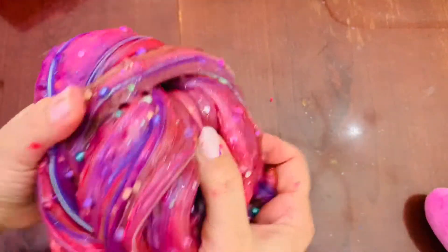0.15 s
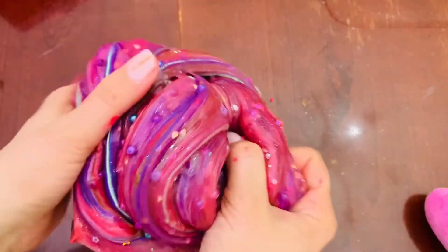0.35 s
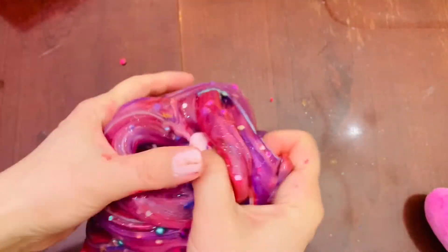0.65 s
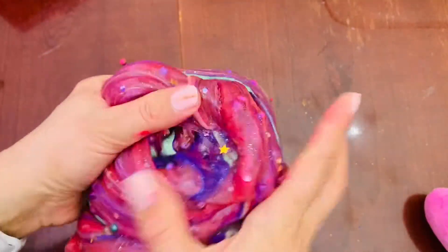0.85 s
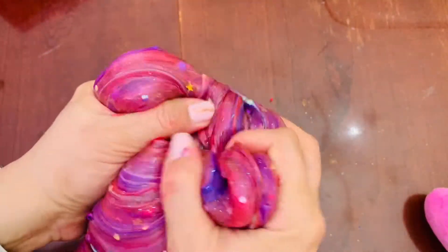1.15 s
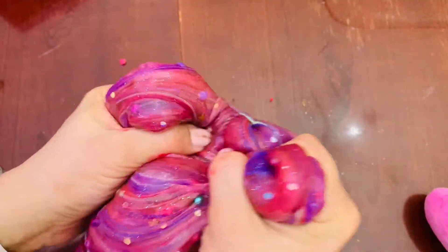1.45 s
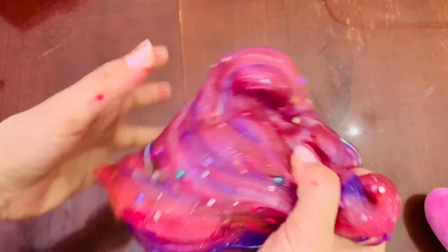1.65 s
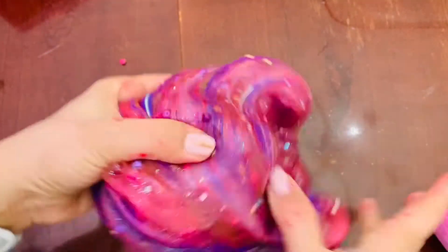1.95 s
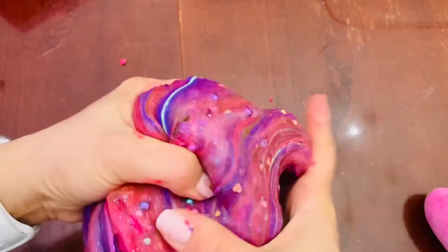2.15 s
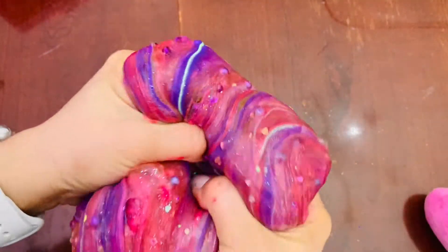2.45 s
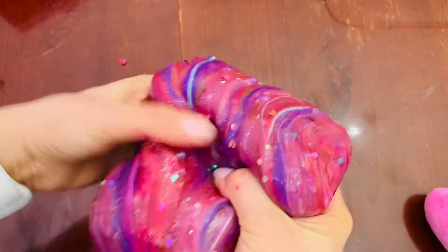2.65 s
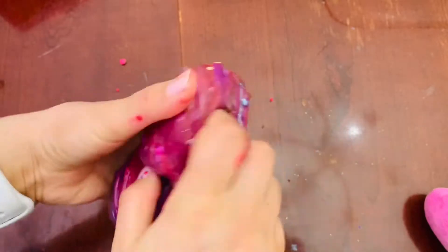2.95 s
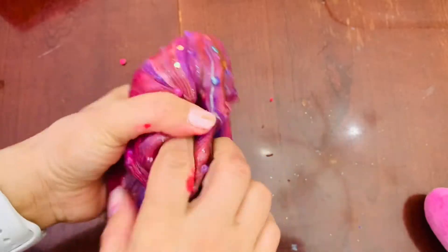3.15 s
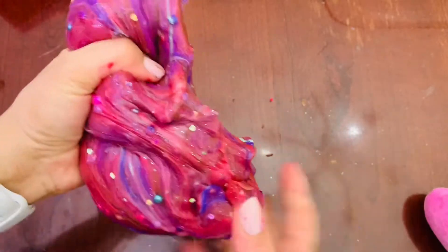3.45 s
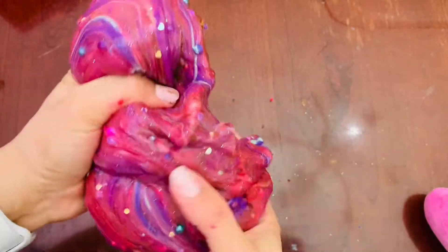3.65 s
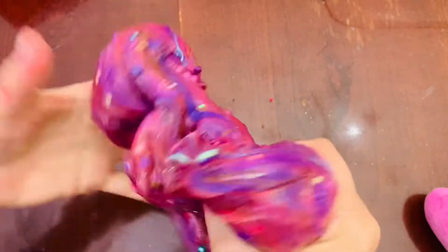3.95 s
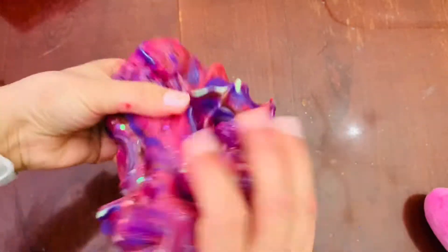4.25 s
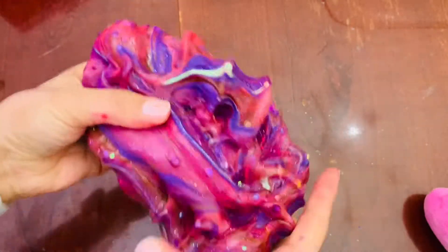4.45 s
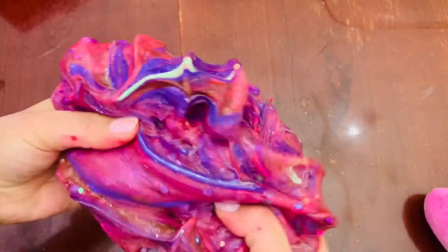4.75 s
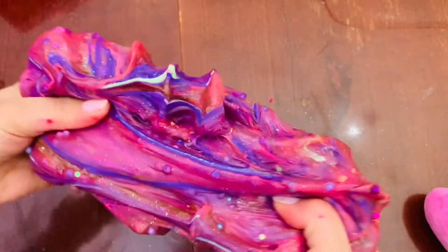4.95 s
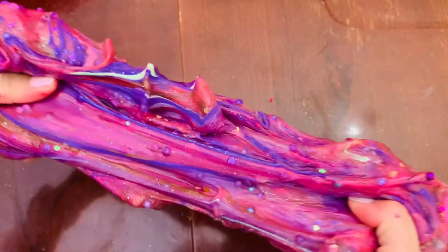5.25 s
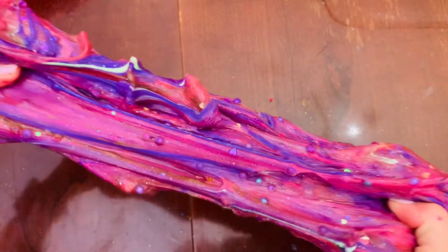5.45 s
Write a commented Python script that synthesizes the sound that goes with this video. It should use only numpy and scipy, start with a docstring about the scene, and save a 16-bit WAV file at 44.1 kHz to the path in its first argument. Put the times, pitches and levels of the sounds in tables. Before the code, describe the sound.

Sticky slime is kneaded, folded and stretched by two hands, close and detailed in stereo, in a small dry quiet room with very faint low rumble and hiss. Air bubbles burst as very short bright snaps, some with a tiny hollow ring, amid brief swells of peeling fizz and wet squelch. A cluster of sharp clicks comes at about 0.4 s, with a soft low thump at 0.3; the busiest, loudest popping runs from 0.9 to 1.25 s, then a wet squelch with plops near 1.5. From 1.6 to 2.8 s the crackle is lighter, with a small flurry at 2.3-2.5. Hard snaps stand out at 2.86, 3.14-3.2, 3.44 and 3.52 s. After a sparse gap around 4 s, sticky peels come at 4.2 and a crisp squelchy pop at 4.7. From 5 s the slow stretch leaves only faint ticks, almost silence.

```python
"""Sticky slime, kneaded, folded and stretched by two hands just in front of a pair of microphone ports.
Trapped air pockets burst: a torn film gives a noise snap, the opened pocket a short damped ring.
Wet skin peels off in swells of fizz, squelch and thud, built from grains and patchy noise.
The lump slumps onto the hand with sagging low thumps.
A small quiet room adds shaped noise as low rumble and faint hiss, and a short answer to the pops."""
import sys
import numpy as np
from scipy import signal
from scipy.fft import rfft, irfft, next_fast_len
from scipy.io import wavfile
from scipy.ndimage import uniform_filter1d, map_coordinates

SR = 44100
rng = np.random.default_rng(int(sys.argv[2]) if len(sys.argv) > 2 else 0)


def wrap_up_sound(samples):
    """Save the sound to the file named by the first command line argument, as 16-bit audio."""
    columns = np.atleast_2d(samples).T
    # keep every value between -1 and 1, then stretch to whole-number steps
    tamed = np.clip(columns, -1, 1)
    steps = np.round(tamed * 32767).astype(np.int16)
    wavfile.write(sys.argv[1], SR, steps)


def convert_level_to_amplitude(level_db):
    """Map a level in decibels to its linear amplitude factor."""
    exponent = np.asarray(level_db, float) / 20
    return 10 ** exponent


N = 246959

# clearest bursting air pockets: t/s, snap level/dB, snap f/Hz, ring level/dB, ring f/Hz
CLEAR_POCKETS = [(0.05, -19.5, 8900, -20.5, 2400), (0.078, -34.5, 11100, -38.5, 1000),
                 (0.0858, -11, 11200, -37.5, 1740), (0.216, -32, 5630, -34.5, 2100),
                 (0.274, -27, 11900, -58, 1460), (0.305, -37, 5600, -24.5, 1790),
                 (0.312, -25, 8900, -24.5, 1900), (0.3862, -6, 12200, -52, 1630),
                 (0.4048, -12.5, 11400, -74, 2780), (0.4135, -16.5, 11500, -71, 3250),
                 (0.4217, -7.5, 12100, -62, 1640), (0.4362, -26, 12800, -80, 1500),
                 (0.5756, -22.5, 11100, -70, 1510), (0.5993, -12.5, 6700, -18.5, 1880),
                 (0.6478, -22, 6850, -23, 1920), (0.6869, -43, 6700, -28, 2630),
                 (0.7738, -19.5, 9400, -59, 453), (0.8323, -35, 6660, -45, 1260),
                 (0.8873, -2.5, 10400, -32, 2400), (0.9139, -14.5, 9200, -37.5, 2200),
                 (0.9677, 2, 13200, -28.5, 2420), (0.9808, -40, 9200, -31, 2080),
                 (0.986, -35.5, 6000, -38, 1910), (1.0096, -11.5, 11800, -40.5, 2190),
                 (1.013, -10, 11200, -38, 2840), (1.062, -8, 12600, -61, 1460),
                 (1.08, -21, 11600, -34.5, 1830), (1.0894, -16, 9300, -31.5, 1830),
                 (1.1136, -13.5, 10400, -42, 1720), (1.12, -21, 10700, -57, 2900),
                 (1.1418, -16.5, 10400, -49, 2130), (1.157, -29, 8700, -44, 2280),
                 (1.1696, -17.5, 8800, -33.5, 2050), (1.1854, -2, 9400, -33.5, 1870),
                 (1.1987, -0.5, 12200, -49, 1410), (1.2305, -82, 7900, -33, 1120),
                 (1.2397, -3.5, 7630, -18, 1430), (1.2778, -33, 9100, -55, 3010),
                 (1.3324, -21, 12400, -34.5, 2050), (1.4596, -11.5, 8800, -27, 1200),
                 (1.464, -61, 8500, -21, 1250), (1.4767, -24, 8200, -14.5, 2550),
                 (1.4814, -17, 8500, -18, 2500), (1.5564, -26.5, 8500, -36, 3490),
                 (1.6257, -43, 6860, -38, 1500), (1.7639, -24.5, 8300, -21, 3830),
                 (1.7964, -16, 6600, -22.5, 1036), (1.8908, -18.5, 10500, -40.5, 1690),
                 (1.9214, -21, 10800, -51, 2610), (2.0455, -26.5, 10800, -41.5, 1660),
                 (2.062, -25.5, 7300, -25, 2830), (2.139, -22, 11100, -44.5, 1420),
                 (2.218, -19.5, 6900, -45, 2320), (2.2583, -7.5, 10900, -50.5, 520),
                 (2.2782, -23.5, 10200, -36.5, 1690), (2.2868, -17.5, 5700, -41, 1550),
                 (2.304, -31.5, 4770, -29.5, 3430), (2.3366, -20, 9900, -53, 3210),
                 (2.366, -50, 6000, -42.5, 980), (2.388, -40, 6100, -36.5, 750),
                 (2.3964, -13, 5830, -56, 2320), (2.4038, -44, 6100, -28.5, 1420),
                 (2.4195, -24, 11800, -47, 1720), (2.4396, -23, 11200, -38, 1450),
                 (2.4897, -19.5, 11400, -28.5, 3160), (2.4915, -14, 9000, -34.5, 1130),
                 (2.5138, -29, 7300, -60, 1980), (2.544, -30.5, 5060, -27.5, 3900),
                 (2.6136, -26.5, 9450, -25, 2620), (2.7572, -12, 7300, -32, 2940),
                 (2.8644, -3, 9240, -50, 3540), (2.931, -18.5, 13000, -48, 2090),
                 (2.9441, -27.5, 9200, -34.5, 2700), (3.0515, -24.5, 11300, -49.5, 1400),
                 (3.1419, 2, 6900, -32, 2600), (3.1825, 0, 10500, -26, 2860),
                 (3.2045, -17, 11800, -45, 3250), (3.233, -40, 5100, -28, 2800),
                 (3.277, -45, 7400, -29.5, 2500), (3.3384, -7, 8130, -31.5, 3560),
                 (3.366, -57, 4200, -34, 3920), (3.4382, 1, 11600, -48, 2260),
                 (3.5244, -3, 11400, -18, 4070), (3.689, -13.5, 10600, -43, 1370),
                 (3.7279, -18.5, 7300, -29, 3370), (3.738, -17.5, 8140, -38, 1310),
                 (3.8586, -21, 9500, -47, 3460), (3.8979, -27, 8970, -53, 1000),
                 (3.926, -27.5, 9000, -68, 3180), (3.955, -65, 7000, -55, 1200),
                 (4.3728, -26.5, 9160, -76, 2910), (4.4116, -18.5, 10440, -49, 3160),
                 (4.5679, -29, 8780, -74, 2750), (4.5794, -18.5, 13200, -40, 1860),
                 (4.584, -21.5, 14200, -38.5, 3300), (4.6377, -33.5, 5470, -44.5, 2930),
                 (4.681, -28, 7200, -41, 1600), (4.6949, -8.5, 7300, -33.5, 1590),
                 (4.698, -14, 7000, -33.5, 1885), (4.753, -31, 11400, -42, 1480),
                 (4.7971, -17, 10070, -48, 1370), (4.833, -53, 8100, -38, 1370),
                 (4.8638, -17, 8200, -40, 1550), (4.9043, -28.5, 10500, -55, 870),
                 (4.966, -42.5, 7000, -53, 1560), (4.994, -48, 6950, -54.5, 1330),
                 (5.0616, -26, 11100, -74, 3200), (5.0826, -45, 7000, -41, 2630),
                 (5.096, -39, 8300, -46.5, 2270), (5.112, -45, 7200, -50, 1830),
                 (5.155, -55, 7000, -60.5, 1510), (5.1863, -56.5, 4970, -45, 3250),
                 (5.207, -39, 4400, -39.5, 3450), (5.226, -28, 10900, -37, 3600),
                 (5.252, -58, 6000, -59.5, 1610), (5.33, -63, 6000, -62, 2100),
                 (5.426, -49, 7000, -60, 3500), (5.464, -47, 5150, -67, 2820),
                 (5.484, -60, 5950, -60, 1020), (5.578, -50.5, 7000, -64, 3330)]
# squeezes and pulls of the hands: full grip t/s, held/s, fizz level/dB, squelch level/dB, build-up/(dB/s)
HAND_SQUEEZES = [(0.067, 0.013, -50, -52.5, 265), (0.23, 0.017, -59, -60.5, 153),
                 (0.303, 0.012, -45, -43, 596), (0.40, 0.011, -71, -74, 205.5),
                 (0.6, 0.062, -42, -51.5, 1500), (0.691, 0.044, -45, -44, 237),
                 (1.094, 0.013, -59, -56, 251), (1.236, 0.021, -47.5, -51.5, 85.5),
                 (1.472, 0.014, -35.5, -39, 428.5), (1.6, 0.34, -56, -61.5, 205.5),
                 (1.798, 0.046, -46, -49, 400), (1.89, 0.021, -53.5, -66, 300),
                 (2.069, 0.058, -60.5, -65.5, 233.5), (2.283, 0.024, -53.5, -54, 170.5),
                 (2.412, 0.011, -49.5, -51, 168), (2.552, 0.035, -43.5, -46.5, 493.5),
                 (2.609, 0.013, -41, -45.5, 302.5), (2.748, 0.0067, -44.5, -53.5, 305.5),
                 (3.057, 0.032, -63, -60, 480), (3.137, 0.064, -37, -52, 519),
                 (3.228, 0.025, -46, -49.5, 310.5), (3.357, .04, -45, -68.5, 396),
                 (3.722, 0.11, -43, -47.5, 450), (4.167, 0.026, -55, -55.5, 505),
                 (4.198, 0.0067, -45, -49.5, 391), (4.269, 0.0068, -56.5, -74, 202),
                 (4.703, 0.0085, -43.5, -53, 443), (4.771, 0.14, -61.5, -65, 203.5),
                 (5.09, 0.098, -73, -76.5, 165), (5.271, 0.047, -74.5, -79, 200),
                 (5.42, 0.052, -71.5, -81.5, 179)]
# lump slumping onto the hand: t/s, level/dB before the swell, f/Hz
LUMP_THUMPS = [(0.085, -47, 168), (0.308, -28.5, 194), (0.748, -40, 267), (1.47, -49, 160),
               (1.559, -48, 212), (1.745, -47, 130), (3.143, -48.5, 250), (3.266, -49, 298),
               (3.677, -38.5, 120), (3.827, -39, 222), (4.209, -49, 131)]
# relative spectrum of peeling fizz: f/Hz, level/dB
FIZZ_SPECTRUM = [(1500, -38), (4000, 9), (7000, 3.5), (10000, 8), (15500, 2)]
# relative spectrum of wet squelch: f/Hz, level/dB
SQUELCH_SPECTRUM = [(200, -20), (600, -10.5), (1200, -5), (2200, 0), (4000, -2), (5500, -21.5),
                    (8000, -40.5)]
# relative spectrum of the shifting lump: f/Hz, level/dB
THUD_SPECTRUM = [(50, -30.5), (120, -12.5), (200, -13), (500, -6), (1000, -27.5)]
# relative spectrum of room rumble and hiss: f/Hz, level/dB
QUIET_SPECTRUM = [(25, -46), (45, 0), (70, -8.5), (130, -14.5), (300, -21.5), (800, -41.5), (1300, -35),
                  (2000, -27.5), (5000, -30.5), (10000, -32.5), (15500, -34.5)]
# left-right likeness of spread sounds ahead of the ports: f/Hz, correlation/1
LIKENESS = [(50, 0.96), (250, 0.62), (600, 0.2), (1200, 0.76), (3000, 0.08), (6000, 0.94)]
# decay of the room's answer: f/Hz, t60/s
ROOM_DECAY = [(300, .15), (2000, .11), (10000, .06)]
# phase by which the left port leads: f/Hz, lead/rad
LEFT_LEAD = [(300, 0), (1700, .1), (2600, .6), (3450, 1.8), (5170, 3.3), (6900, 5.1), (8600, 6.4),
             (12060, 9.2), (15500, 12.0)]
# port balance: f/Hz, left minus right level/dB
PORT_TILT = [(60, 0), (200, -3), (1200, 0), (2500, -3.5), (6000, 0)]


def unit(x):
    """Scales to rms 1."""
    return x / np.sqrt(np.mean(x ** 2) + 1e-20)


def along(points, hz):
    """Interpolates (f/Hz, value) points on a log frequency axis."""
    f, v = np.transpose(points)
    return np.interp(np.log(hz + 1), np.log(f + 1), v)


def filtered(x, response):
    """Applies a complex response of frequency to x."""
    m = next_fast_len(N + SR // 2)
    return irfft(rfft(x, m) * response(np.fft.rfftfreq(m, 1 / SR)), m)[..., :N]


def low_cut(f, corner_hz):
    """First-order high-pass response."""
    return 1j * f / corner_hz / (1 + 1j * f / corner_hz)


def wobble(knots_per_s):
    """Smooth random curve."""
    knots = rng.standard_normal(int(N * knots_per_s / SR) + 4)
    return map_coordinates(knots, [np.arange(N) * knots_per_s / SR])


def patchy(depth_db):
    """Two noises whose strength varies in shared small patches of time and pitch."""
    z = signal.stft(rng.standard_normal((2, N)), nperseg=256)[2]
    field = rng.standard_normal(z.shape[1:])
    field = uniform_filter1d(field, size=9, axis=0)
    field = uniform_filter1d(field, size=5, axis=1)
    return unit(signal.istft(z * convert_level_to_amplitude(depth_db * unit(field)), nperseg=256)[1][:, :N])


def spread(pair, spectrum):
    """Turns two unrelated signals into a coloured, partly alike left and right."""
    def mid_side(hz):
        gain = convert_level_to_amplitude(along(spectrum, hz) - 25 * (hz > 15900))
        angle = np.arccos(np.clip(along(LIKENESS, hz), -1, 1)) / 2
        return gain * [np.cos(angle), np.sin(angle)]

    mid, side = filtered(pair, mid_side)
    return unit(np.array([mid + side, mid - side]))


def lay(t_s, rows):
    """Sums one short sound per row at its time."""
    at = np.round(t_s * SR).astype(int)[:, None] + np.arange(rows.shape[1])
    return np.bincount(at.ravel(), rows.ravel(), N + rows.shape[1])[:N]


def quiet():
    """Low room rumble and faint hiss: steady shaped noise."""
    return convert_level_to_amplitude(-71.0) * spread(rng.standard_normal((2, N)), QUIET_SPECTRUM)


def swells(t_s, held_s, level_db, rise_db_s, fade_db_s):
    """Power sum, in dB, of envelopes that build up, hold and fade."""
    step = 32
    late_s = np.arange(0, N, step) / SR - t_s[:, None]
    build_db = np.reshape(rise_db_s, (-1, 1)) * np.maximum(-late_s, 0)
    fade_db = fade_db_s * np.maximum(late_s - np.reshape(held_s, (-1, 1)), 0)
    power = (convert_level_to_amplitude(level_db[:, None] - build_db - fade_db) ** 2).sum(0)
    return np.repeat(10 * np.log10(power + 1e-12), step)[:N]


def effort():
    """Fizz, squelch and thud levels in dB: squeezes, plus fizz and squelch left by each clear burst."""
    t_s, held_s, fizz_db, squelch_db, rise_db_s = np.transpose(HAND_SQUEEZES)
    burst_s, snap_db = np.transpose(CLEAR_POCKETS)[:2]

    def after(level_db, share, fade_db_s):
        # share: part of the snap's dB that is followed
        return swells(burst_s, 0, level_db + share * snap_db, 1e4, fade_db_s)

    def power_sum(a_db, b_db):
        return 10 * np.log10(convert_level_to_amplitude(a_db) ** 2 + convert_level_to_amplitude(b_db) ** 2)

    fizz = swells(t_s, held_s, fizz_db, rise_db_s, fade_db_s=223.5)
    squelch = swells(t_s, held_s, squelch_db, rise_db_s, fade_db_s=254.5)
    thud = swells(t_s, held_s, squelch_db - 10, rise_db_s, fade_db_s=183.5)
    fizz = power_sum(fizz, after(level_db=-42.5, share=0.62, fade_db_s=380))
    squelch = power_sum(squelch, after(level_db=-55.5, share=0.69, fade_db_s=260))
    return fizz, squelch, thud


def grains(count, hz, octaves, cycles, scatter_db, size):
    """Tiny damped rings at random times, pitches and strengths."""
    when, big, phase = rng.random((count, 3)).T
    pitch_hz = np.clip(hz * 2 ** (octaves * rng.standard_normal(count)), 100, SR / 2.3)[:, None]
    t = np.arange(size) / SR
    strength = convert_level_to_amplitude(-scatter_db * np.log(1.01 - big))[:, None]  # many weak, few strong
    ring = np.sin(2 * np.pi * (pitch_hz * t + phase[:, None])) * np.exp(-t * pitch_hz / cycles)
    return unit(lay(when * (N - 1) / SR, strength * ring))


def kneading(fizz_db, squelch_db, thud_db):
    """Skin peels off in tiny threads (fizz), wet folds suck (squelch), the lump shifts (thud)."""
    jerk_db = 2 * wobble(90)  # peeling goes in quick jerks
    dense = np.clip((fizz_db + 72) / 30, .15, .78)  # gentle pulls crackle, hard squeezes blur into a rush

    def mix(bits, rush):
        return np.sqrt(1 - dense) * np.array(bits) + np.sqrt(dense) * rush

    threads = [grains(count=5000, hz=8500, octaves=.6, cycles=1.6, scatter_db=4.8, size=64)
               for _ in range(2)]
    folds = [grains(count=6000, hz=1957, octaves=0.823, cycles=6.1, scatter_db=3.0, size=400)
             for _ in range(2)]
    fizz = convert_level_to_amplitude(fizz_db + jerk_db) * spread(mix(threads, patchy(6.1)), FIZZ_SPECTRUM)
    squelch = convert_level_to_amplitude(squelch_db + jerk_db) * spread(mix(folds, patchy(6.4)), SQUELCH_SPECTRUM)
    thud = convert_level_to_amplitude(thud_db + 2.1 * wobble(28)) * spread(patchy(2.8), THUD_SPECTRUM)
    return fizz + squelch + thud


def small_pockets(fizz_db):
    """Draws small pockets bursting at random, stronger while the slime fizzes; columns as CLEAR_POCKETS."""
    count, spread_db = 170, 6.5
    t_s = .01 + rng.random(count) * (N / SR - .02)
    a, b, c, d = rng.standard_normal((count, 4)).T
    busy_db = 0.64 * (np.maximum(fizz_db[(t_s * SR).astype(int)], -95) + 60)  # 0 at a fizz of -60 dB
    snap_db = -45.5 + busy_db + spread_db * a
    snap_hz = np.clip(8500 * 2 ** (1.2 * b), 3000, 14000)
    ring_db = -62 + busy_db + spread_db * c
    ring_hz = 2053 * 2 ** (.5 * d)
    return np.transpose([t_s, snap_db, snap_hz, ring_db, ring_hz])


def to_peak(rows):
    """Scales each row to an envelope peak of 1."""
    return rows / abs(signal.hilbert(rows)).max(1, keepdims=True)


def film_snap(t, f, snap_hz, wetness_db):
    """The film over a pocket tears: a noise burst through the film's resonance plus a broad lower body."""
    tear_cycles, scatter, longer_db_per_db = 1.62, .15, 0.39  # length scale, its log spread, wet stretch
    ms = 1000 * tear_cycles / snap_hz * convert_level_to_amplitude(longer_db_per_db * np.clip(wetness_db, -12, 22))
    ms = ms * np.exp(scatter * rng.standard_normal(snap_hz.shape))
    life = t * 1000 / ms
    shape = np.where(t < 0, np.exp(2 * life), np.exp(-1.4 * life) + 0.14 * np.exp(-t / 0.0013))
    crack = 0.038 / ms ** 2 * (abs(t) < .5 / SR)  # the briefest tears are one clean crack
    tear = rng.standard_normal(shape.shape) * shape + crack
    film = 1j * f * 1.3 * snap_hz / (snap_hz * snap_hz - f * f + 1j * f * 0.48 * snap_hz)
    # little of the snap lies below its pitch
    steep = (1j * f / (.7 * snap_hz) / (1 + 1j * f / (0.38 * snap_hz))) ** 2
    body = convert_level_to_amplitude(-21.5) * low_cut(f, 2400) ** 2 / (1 + 1j * f / snap_hz)
    return to_peak(irfft(rfft(tear) * (film * steep + body)))


def pocket_ring(t, f, ring_hz):
    """The opened pocket rings for a few cycles in two modes, the lower gliding up."""
    turns = ring_hz * np.maximum(t, 0) + np.minimum(0.69 + ring_hz * t, .7).clip(0)
    upper = rng.uniform(1.5, 2.6, ring_hz.shape)  # an uneven pocket has a second mode
    modes = np.sin(2 * np.pi * turns * (1 + 0.0078 * turns)) + 0.61 * np.sin(2 * np.pi * upper * turns)
    ring = modes * np.exp(-turns / 1.62) * (1 - np.exp(-turns / 0.15))
    # a small pocket radiates no bass
    return to_peak(irfft(rfft(ring) * low_cut(f, .18 * ring_hz) ** 2))


def pops(pockets):
    """Each pocket's film tears with a snap, then the opened pocket rings."""
    t_s, snap_db, snap_hz, ring_db, ring_hz = np.transpose(pockets)[:, :, None]
    lead_s = .002
    t = np.arange(512) / SR - lead_s
    f = np.fft.rfftfreq(len(t), 1 / SR)
    wetness_db = ring_db - snap_db + 21  # a strong ring for its snap: a longer tear
    snap = convert_level_to_amplitude(snap_db) * film_snap(t, f, snap_hz, wetness_db)
    ring = convert_level_to_amplitude(ring_db) * pocket_ring(t, f, ring_hz)
    return lay(t_s[:, 0] - lead_s, snap + ring)


def room(x):
    """Room's answer: noise tail in which each frequency dies at its own speed."""
    hz, t, z = signal.stft(rng.standard_normal((2, SR // 4)), SR, nperseg=256)
    decay = convert_level_to_amplitude(-60 * t / along(ROOM_DECAY, hz)[:, None])
    tail = signal.istft(z * decay, SR, nperseg=256)[1]
    return signal.fftconvolve(x[None], tail / np.linalg.norm(tail[0]), axes=1)[:, :N]


def thumps():
    """Soft heavy contacts: brief low swings that sag in pitch."""
    t_s, level_db, hz = np.transpose(LUMP_THUMPS)[:, :, None]
    turns = hz * np.arange(4096) / SR
    swell = turns / 0.55 * np.exp(-turns / 0.54)
    swing = np.sin(2 * np.pi * turns / (1 + 0.014 * turns))
    return lay(t_s[:, 0], convert_level_to_amplitude(level_db) * swing * swell)


def scene():
    """Pops with their room answer, thumps, kneading and the quiet room."""
    levels_db = effort()
    burst = pops(np.vstack([CLEAR_POCKETS, small_pockets(levels_db[0])]))
    answer = convert_level_to_amplitude(-22) * room(burst)
    return burst + answer + thumps() + kneading(*levels_db) + quiet()


def roll_off(x):
    """The treble ends steeply here."""
    return signal.sosfilt(signal.butter(12, 17160, fs=SR, output="sos"), x)


def record(dry):
    """Sound reaches the left port first; band limit, then soft saturation of the loudest snaps."""
    top_hz = 16700

    def ports(hz):
        left = convert_level_to_amplitude(along(PORT_TILT, hz) / 2) * np.exp(.5j * along(LEFT_LEAD, hz))
        return np.array([left, 1 / left]) / (1 + (hz / top_hz) ** 60)

    x = filtered(dry, ports)
    mix = x / (1 + abs(x / .9) ** 5) ** .2
    return roll_off(mix)


dry = scene()
out = record(dry)
wrap_up_sound(out)
```